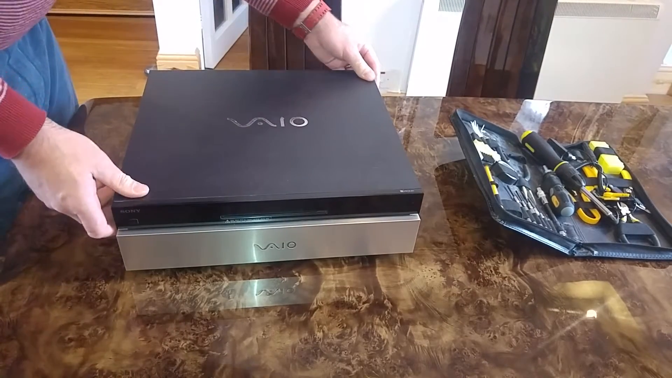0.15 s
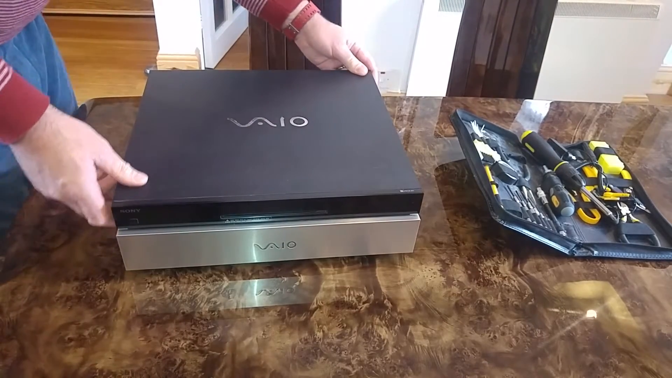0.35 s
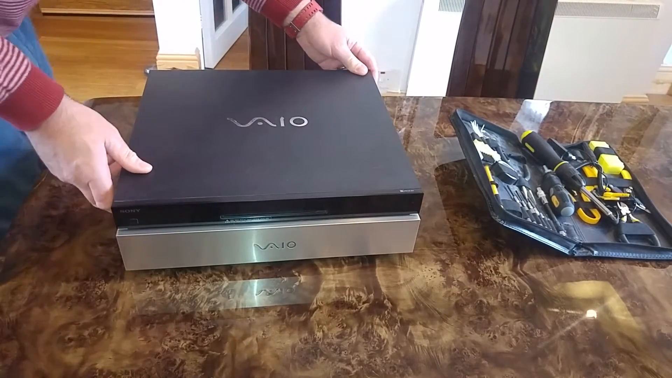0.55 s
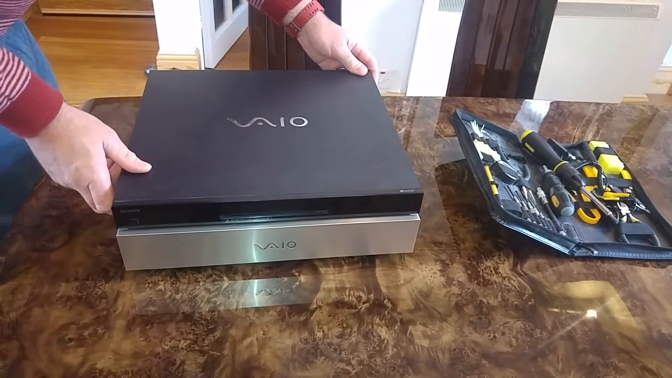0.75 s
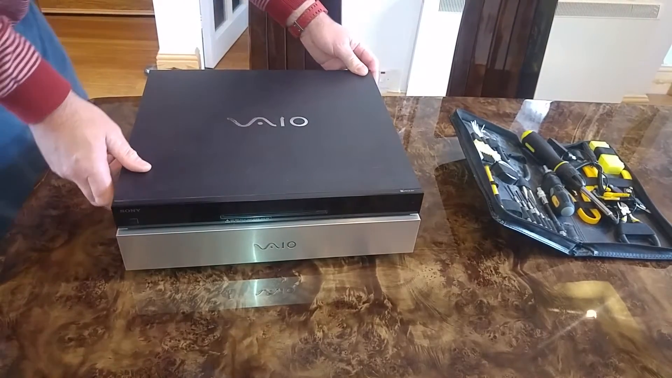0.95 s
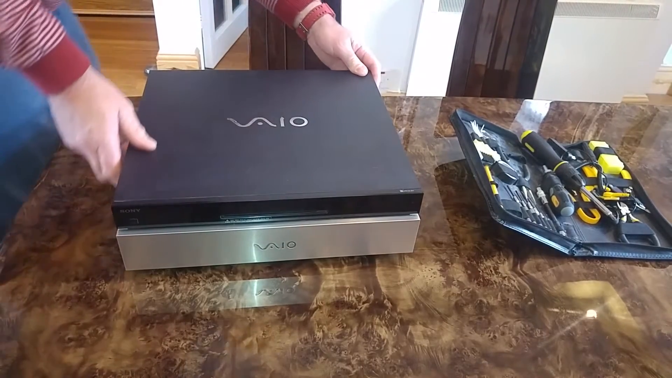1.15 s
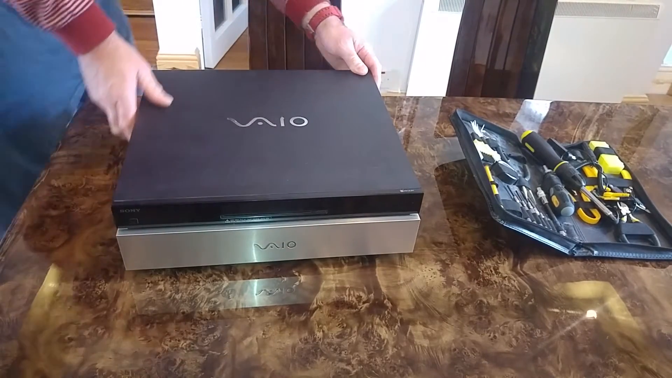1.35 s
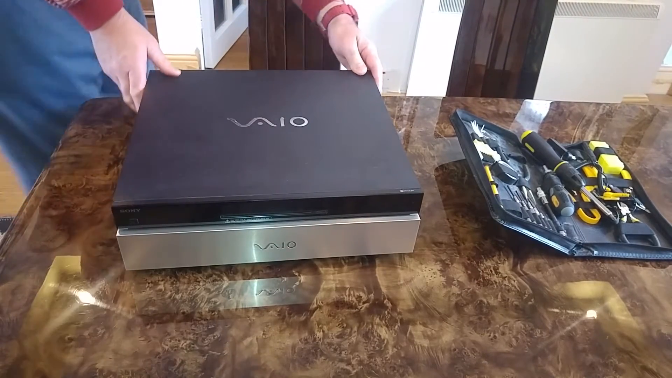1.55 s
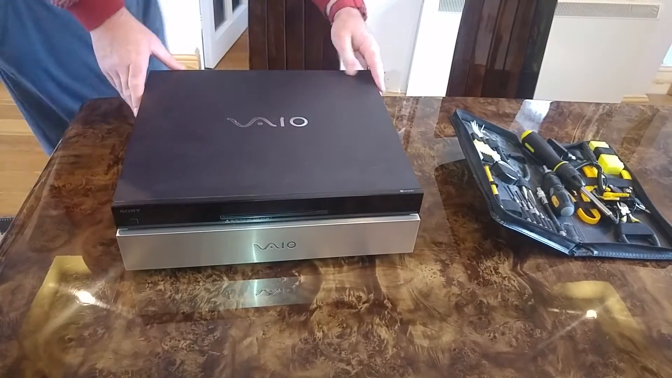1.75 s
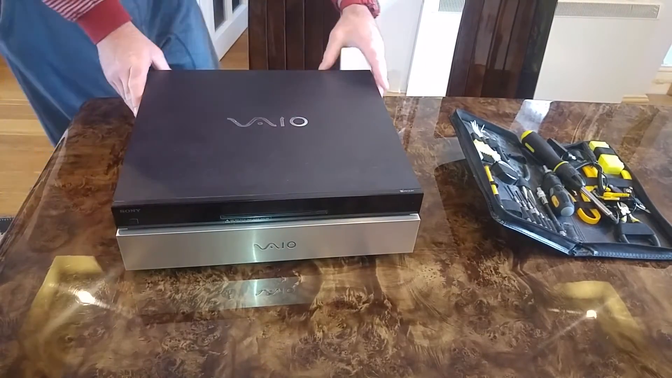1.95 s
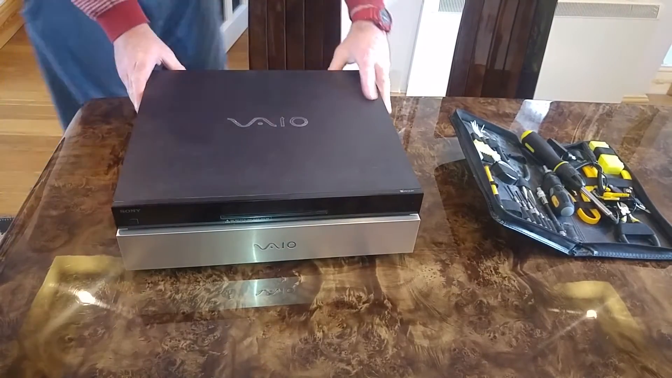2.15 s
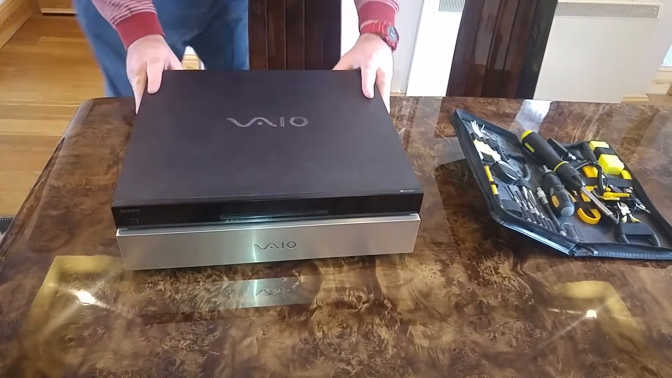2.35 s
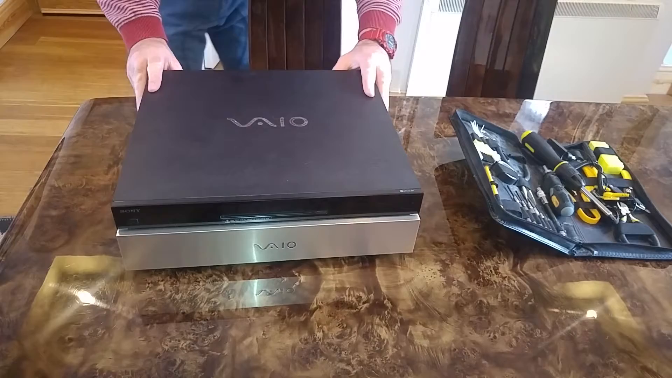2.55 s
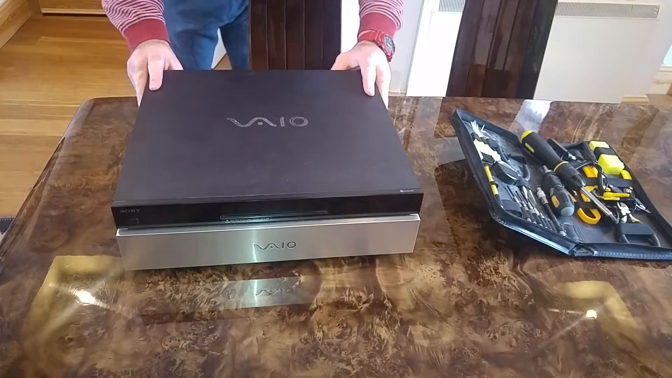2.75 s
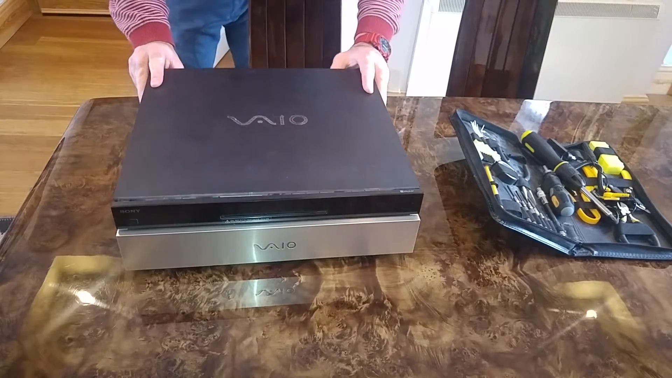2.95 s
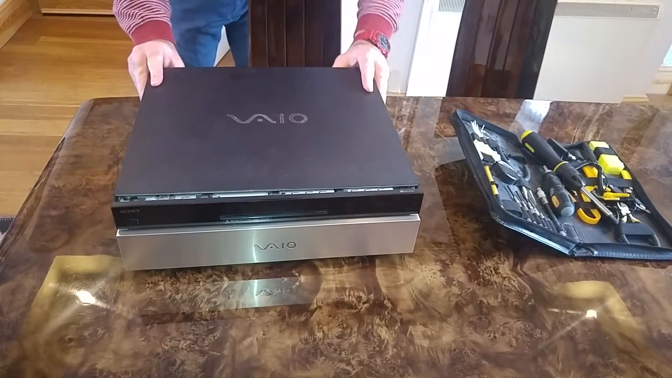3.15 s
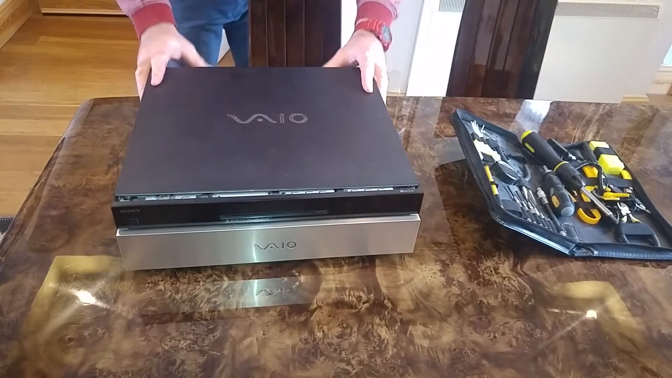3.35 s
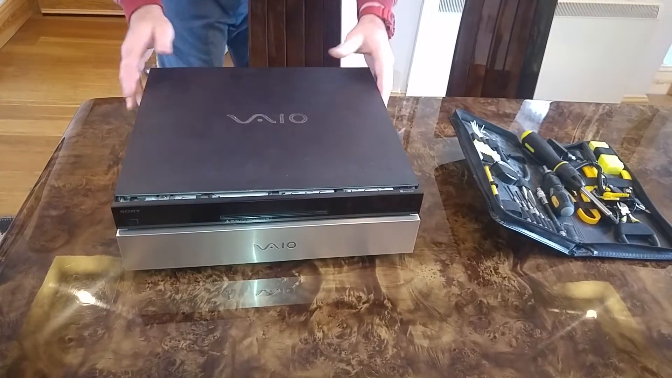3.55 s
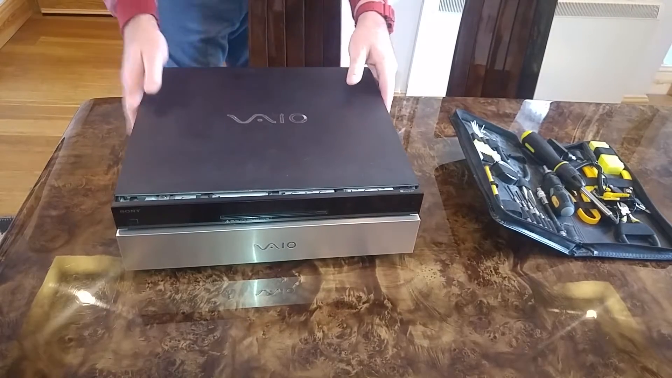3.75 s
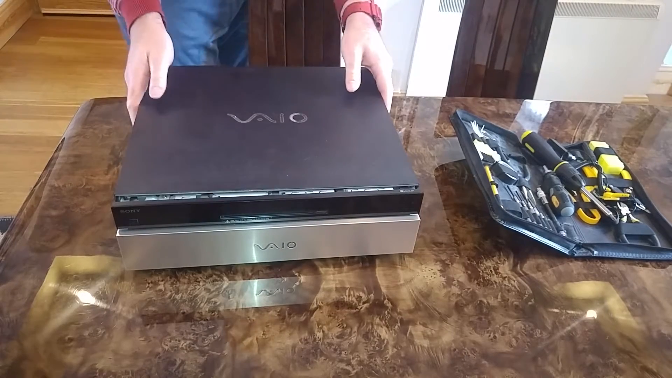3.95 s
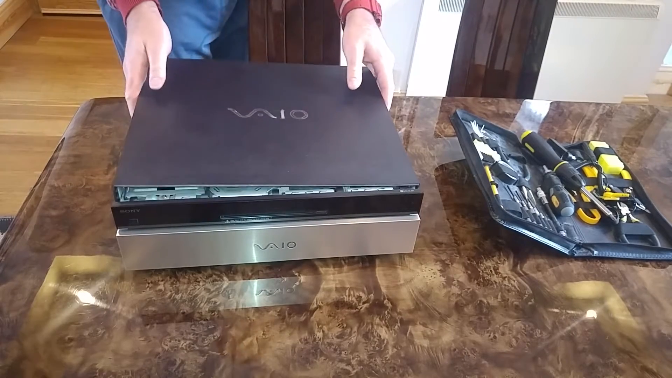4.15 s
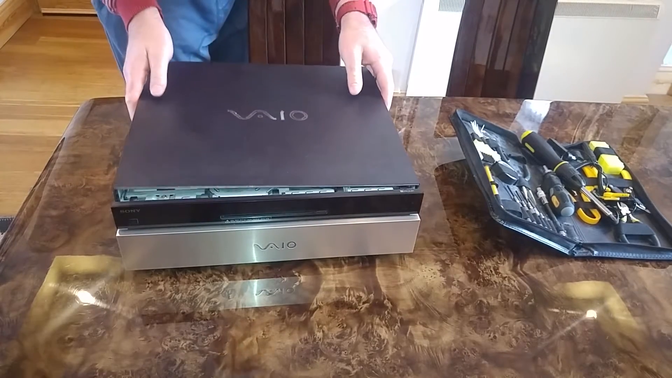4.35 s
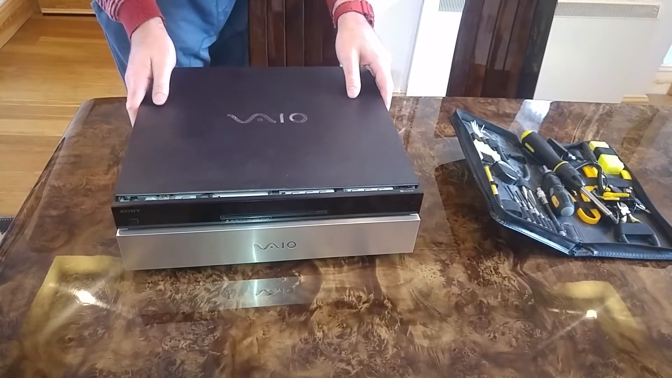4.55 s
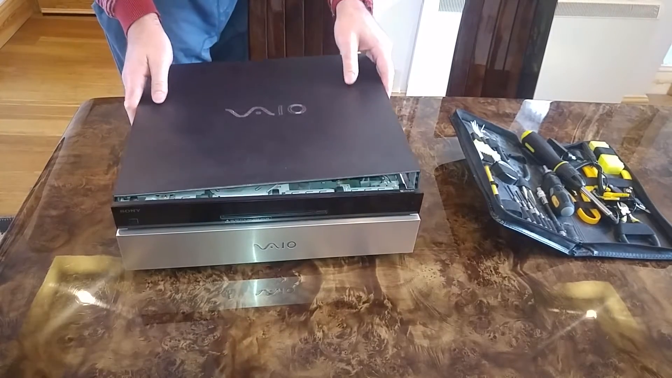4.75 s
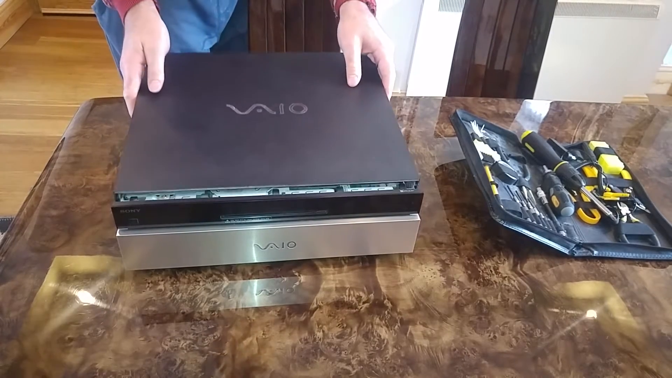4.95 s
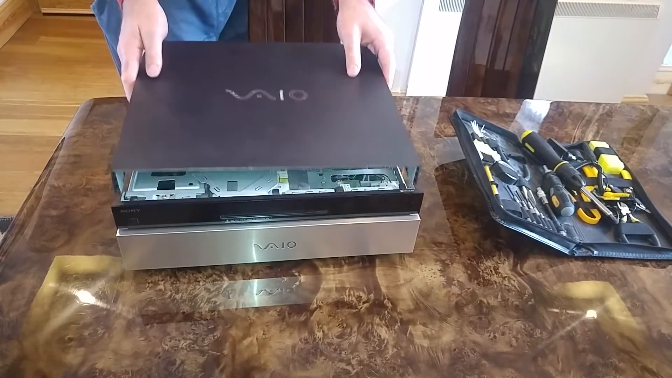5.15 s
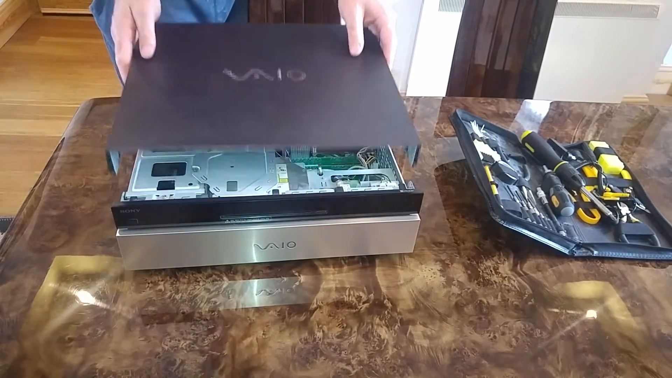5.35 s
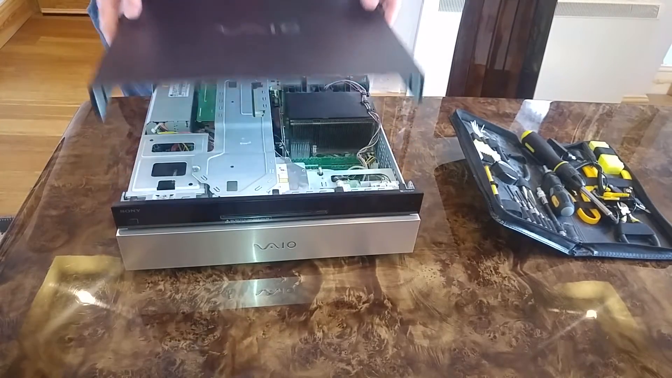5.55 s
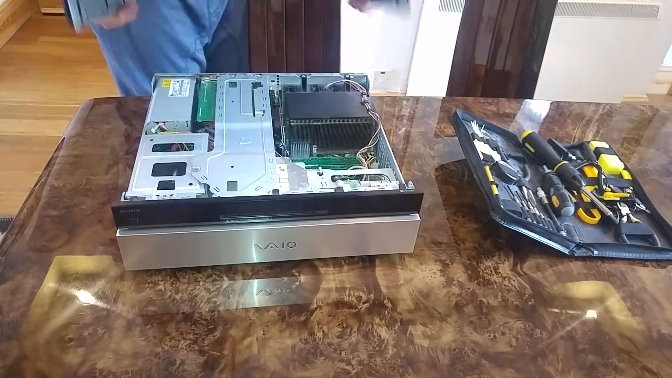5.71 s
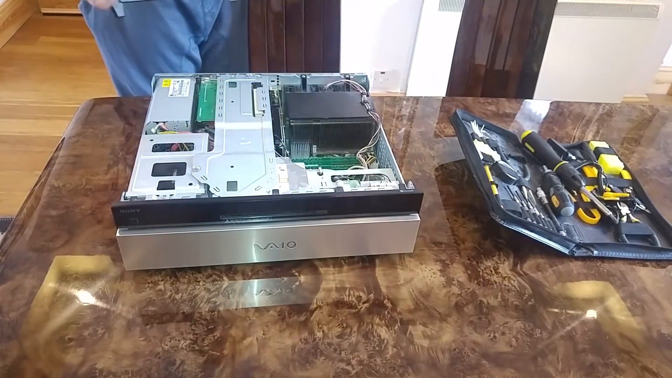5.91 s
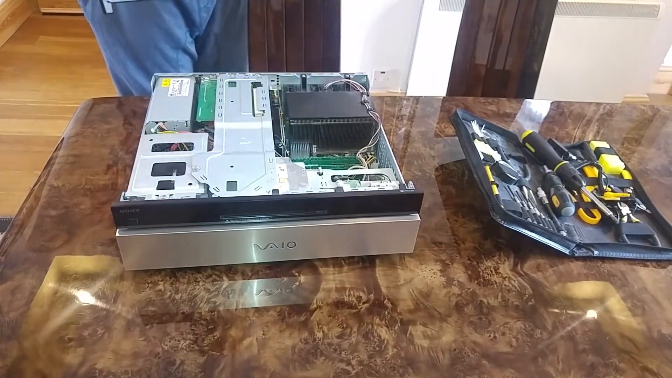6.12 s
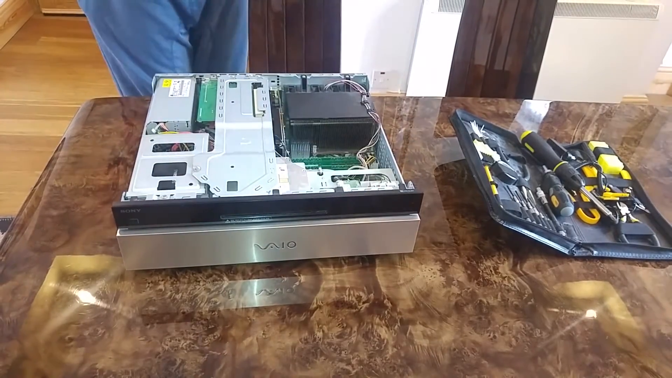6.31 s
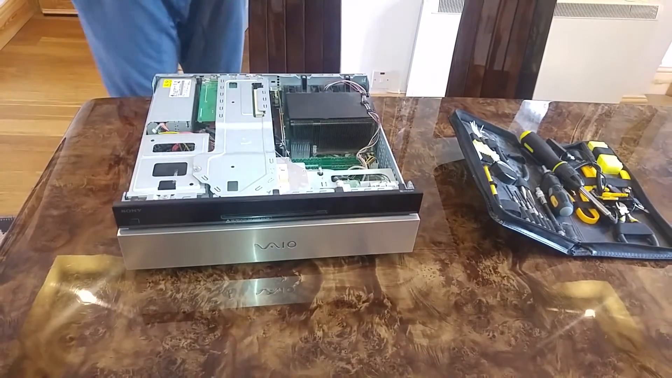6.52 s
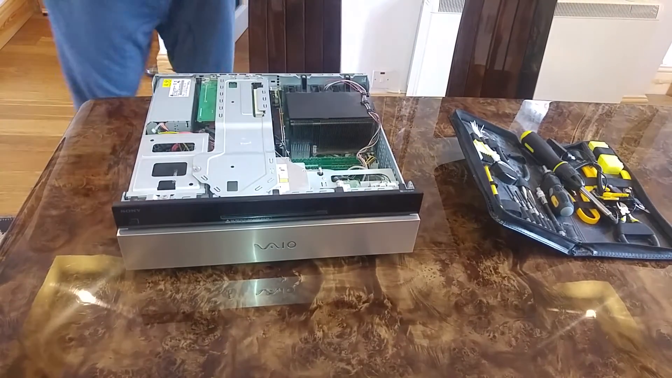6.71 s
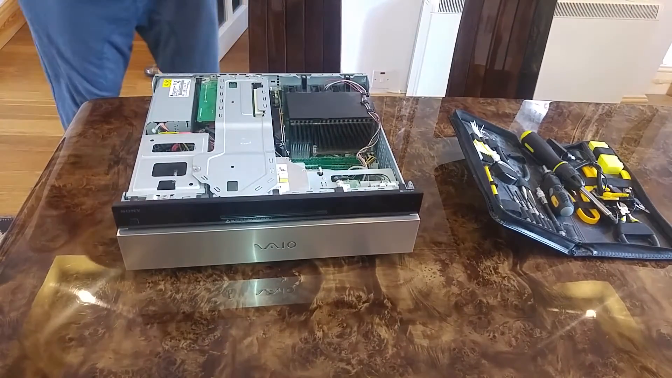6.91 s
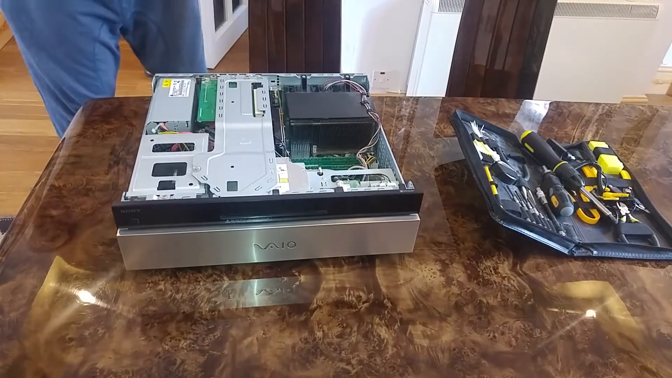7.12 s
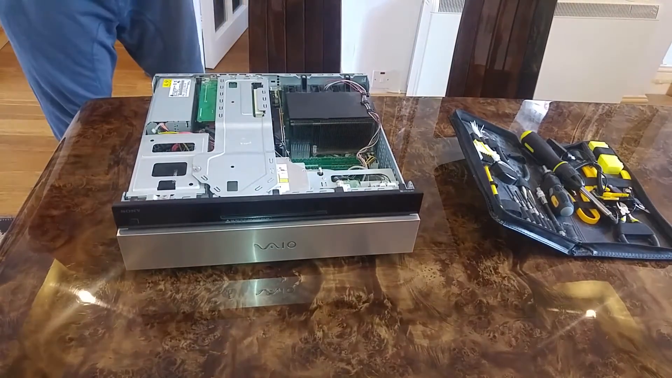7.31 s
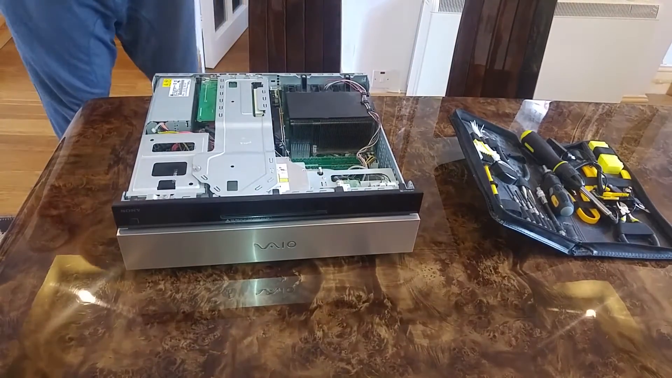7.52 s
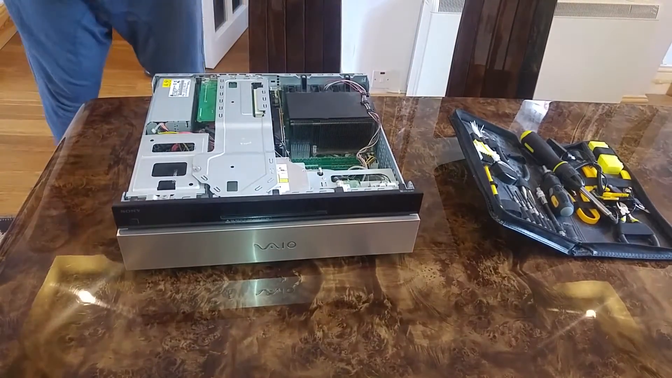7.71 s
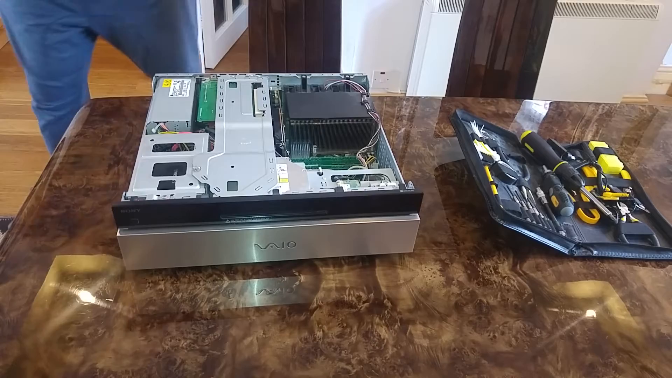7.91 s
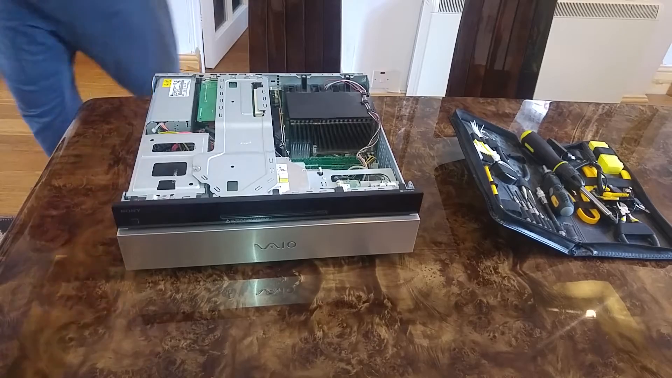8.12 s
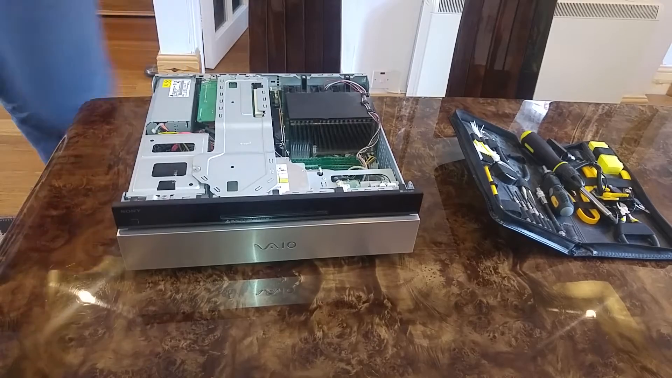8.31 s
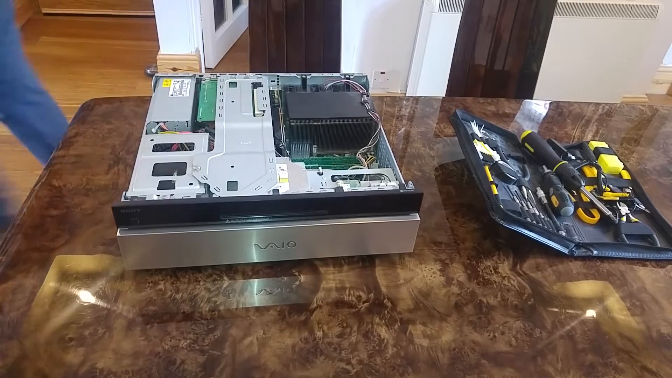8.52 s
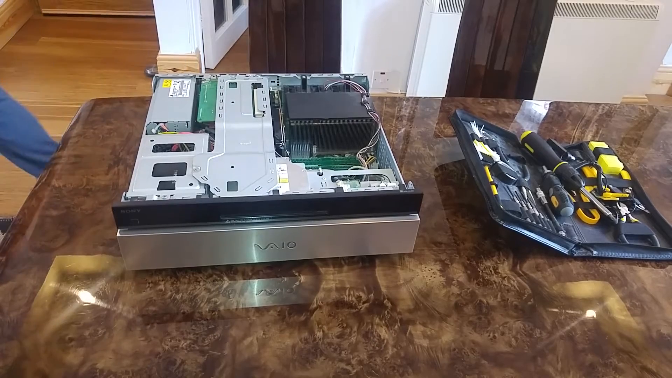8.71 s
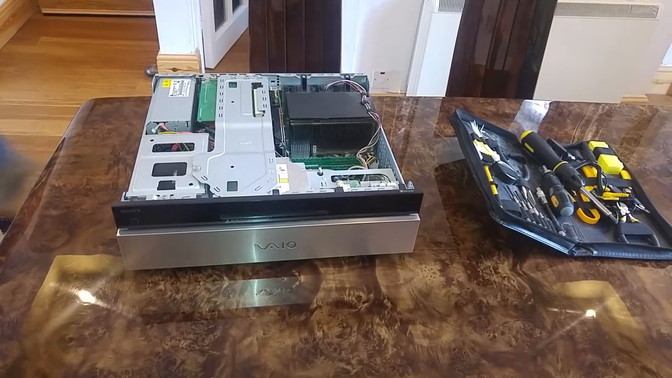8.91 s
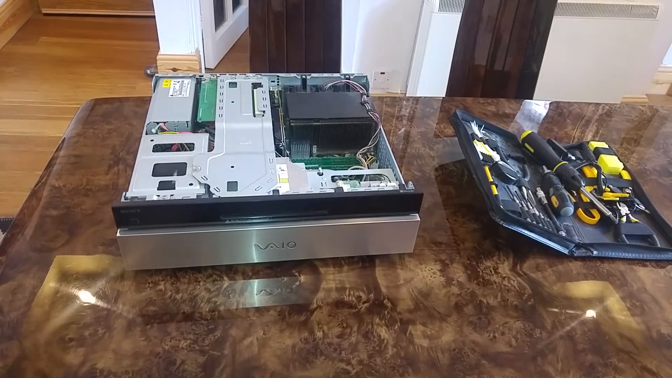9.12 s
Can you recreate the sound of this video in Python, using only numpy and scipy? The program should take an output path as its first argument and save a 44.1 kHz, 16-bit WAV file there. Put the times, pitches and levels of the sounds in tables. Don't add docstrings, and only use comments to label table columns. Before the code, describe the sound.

In a small, hard-walled room with a faint steady hush, two close microphones hear hands on a sheet-steel case. From 0 to 2 s palms and fingers hiss softly over the lid, with light rail scrapes, small ticks and a dull floor thump near 0.8; a longer wipe comes around 1.4. At 2.25 a heavier footfall lands with a low knock. Near 3.0 the cover jolts to its stop: a sharp crack, hollow boom and brief rattle. Around 3.5 to 3.9 the flange hums and faintly squeals along its rail, ending in a knock. Light clicks follow, then from 4.55 to 5.0 a flurry of clanks, strongest at 4.7, with drumming metal and buzzing tabs. Scraping fades as the lid lifts away. From 6 s it is quiet: cloth swishes, small taps, faint scuffs, soft steps near 8, then a deeper thud and clear brushing rustle around 8.8 to 9.

```python
import sys
import numpy as np
from scipy import signal
from scipy.fft import rfft, irfft, next_fast_len
from scipy.io import wavfile
from scipy.ndimage import uniform_filter1d, map_coordinates

SR = 44100
rng = np.random.default_rng(int(sys.argv[2]) if len(sys.argv) > 2 else 0)


def wrap_up_sound(samples):
    columns = np.atleast_2d(samples).T
    tamed = np.clip(columns, -1, 1)
    steps = np.round(tamed * 32767).astype(np.int16)
    wavfile.write(sys.argv[1], SR, steps)


def attenuation_scalar(level_db):
    decades = np.asarray(level_db, float) / 20
    return 10 ** decades


N = 408807

# pitch_hz, level_db
HUSH_COLOUR = [(15, -35.5), (25, -2.5), (158, -9), (450, -17.5), (621, -9), (3000, -22.5), (7280, -17),
               (15000, -39)]
# pitch_hz, likeness_0_to_1
LIKENESS = [(60, .97), (220, .95), (500, .62), (1200, .2), (3000, .05), (7000, .3), (15000, .45)]
# pitch_hz, left_minus_right_db
MICROPHONE_LEAN = [(60, -1.5), (150, -2.5), (380, -0.5), (950, -1), (2380, -0.5), (5980, -2.5), (15000, 3)]
# pitch_hz, width_hz, depth_0_to_1
TABLE_BOUNCE = (500, 55, .85)
# pitch_hz, ring_s
WALL_ECHO = [(100, 0.4), (500, 0.29), (3000, .36), (10000, 0.25), (16000, 0.14)]

# pitch_hz, level_db
FLOOR_COLOUR = [(21, -37.5), (35, -7.5), (54, -7.5), (69, -6), (162, -16.5), (250, -34.5), (320, -61.5),
                (550, -120)]
# start_s, rise_s per 20 dB, fall_s per 20 dB, level_db
WEIGHT_SHIFTS = [(.49, 1.5, 0.5, -71), (.75, 0.3, 0.46, -56), (1.55, 0.8, 1.5, -62.5),
                 (2.45, -0.9, 0.8, -58.5), (3.12, -0.06, 0.25, -51), (3.7, 1, 0.5, -62.5),
                 (4.91, 0.45, 0.21, -52), (5.95, 0.7, 0.9, -74.5), (6.5, -0.4, 0.1, -66),
                 (6.9, 0.34, 0.25, -66.5), (7.49, 0, 0.34, -59), (8.16, 0.1, .23, -59),
                 (8.98, 0.45, 0.7, -55.5)]
# start_s, level_db, board_pitch_hz, ring_s
FOOTFALLS = [(0.496, -64, 61.9, 0.3), (0.669, -64, 61, 0.27), (0.752, -44, 115, 0.32),
             (0.84, -37, 90.5, 0.082), (2.252, -30, 87.6, 0.38), (2.291, -32, 73.5, 0.46),
             (3.402, -48.5, 130, 0.17), (7.324, -61, 86.3, 0.19), (7.494, -60, 73, 0.3),
             (8.002, -41, 60.4, 0.49), (8.121, -40, 58.6, 0.12), (8.574, -51, 49, 0.27),
             (8.801, -29.5, 53.7, 0.59), (8.899, -30.5, 74.6, 0.29)]

# pitch_hz, level_db
SKIN_COLOUR = [(3180, -36.5), (5600, -8), (7130, 4), (8450, 2), (9890, -4.5), (12000, -9.5), (15600, -32),
               (22000, -120)]
# pitch_hz, level_db
PAINT_COLOUR = [(7000, -31.5), (10500, -2.5), (12500, 0.5), (15000, 4)]
# pitch_hz, level_db
COARSE_COLOUR = [(590, -33.5), (1000, -5), (1590, -8.5), (1910, -6.5), (2800, -7.5), (5600, -5.5),
                 (7280, -34), (12300, -120)]
# start_s, rise_s per 20 dB, hold_s, fall_s per 20 dB, level_db
PALM_WIPES = [
    (.44, .15, .15, .09, -53),
    (1.17, .11, .1, .3, -49),
    (1.4, .3, .22, .13, -45),
    (6.66, .012, .015, .045, -55),
]
# start_s, rise_s per 20 dB, hold_s, fall_s per 20 dB, level_db
FINGER_SHIFTS = [(.11, .01, .01, .05, -56), (.36, .4, .01, .1, -60), (.66, .1, .05, .1, -64),
                 (.76, .07, .05, .09, -50), (1.69, .1, .22, .1, -54), (1.94, .05, .01, .33, -52),
                 (2.26, .08, .01, .2, -52), (2.6, .8, .01, .35, -52), (2.86, .04, .01, .16, -55),
                 (2.94, .035, .01, .09, -51), (3.544, .28, .15, .1, -58), (3.728, .06, .01, .18, -48),
                 (3.938, .1, .01, .37, -63), (4.168, .3, .01, .14, -62), (4.458, .13, .01, .11, -65),
                 (4.54, .01, .45, .2, -66), (5.18, .4, .01, .055, -65)]
# start_s, rise_s per 20 dB, hold_s, fall_s per 20 dB, level_db
CLOTH_SWISHES = [(5.78, .45, .1, .1, -71), (5.92, .065, .01, .1, -58), (6.29, .5, .06, .2, -63),
                 (6.4, .07, .04, .15, -52), (6.52, .04, .015, .06, -53), (6.75, .03, .02, .2, -55),
                 (6.865, .1, .01, .06, -57), (7.52, .28, .01, .06, -55), (7.56, .05, .25, .03, -66),
                 (8.0, .02, .05, .17, -55), (8.2, .025, .01, .3, -50), (8.8, .012, .03, .1, -52),
                 (8.88, .055, .02, .12, -35), (9.21, .085, .1, .1, -53)]
# start_s, rise_s per 20 dB, hold_s, fall_s per 20 dB, level_db
SOLE_SCUFFS = [
    (5.05, 0.8, 0.0095, 0.31, -67.5),
    (5.91, 0.65, 0.0079, 0, -73),
    (6.97, -0.44, 0.0355, 0.04, -61.5),
    (7.42, -0.02, 0.016, 0.27, -63),
    (8.28, -0.13, 0.0065, 0.07, -54),
    (8.6, 0.05, 0.0027, 0.2, -55.5),
    (8.74, -3, 0.036, 8, -76),
    (9.24, 0.12, .03, .1, -55.5),
]
# fine_hiss_db, coarse_hiss_db, upper_panel_db, lower_panel_db
PALM_LAYERS = (2.5, -13.5, -22, -24)
FINGER_LAYERS = (-7.5, -7.5, -13.5, -16)
CLOTH_LAYERS = (-9, -9.5, -21, -25.5)
SOLE_LAYERS = (-8.5, -2, -11, -17)

# start_s, level_db, pitch_hz, width_hz, fall_s per 20 dB
LOOSE_PARTS = [(0, -63, 2430, 4100, 0.2), (.101, -50, 7600, 3500, .03), (1.94, -39, 1350, 905, -0.08),
               (2.244, -48, 1424, 111, 0.04), (2.258, -48, 1426, 120, -0.03), (2.25, -42, 520, 400, 0.02),
               (2.861, -49, 6900, 4007, -0.06), (2.932, -49, 7000, 1191, .035),
               (2.932, -44, 1900, 900, .03), (2.995, -47, 12500, 4000, .07),
               (2.9953, -23, 10500, 7000, .009), (2.984, -35, 1900, 1200, .1), (3.03, -25, 690, 160, 0.06),
               (3.548, -47, 7500, 4027, -0.37), (3.805, -56.5, 3700, 1198, -0.03),
               (3.812, -58.5, 2150, 250, -0.03), (3.916, -50, 3320, 298, 0.05),
               (3.916, -41, 1600, 900, .05), (3.916, -39, 925, 120, 0.01), (4.377, -57, 1350, 1200, 0.26),
               (4.54, -54.5, 8500, 4000, -0.1), (4.557, -47, 1200, 500, .08), (4.708, -29, 1300, 1200, .05),
               (4.71, -45, 3500, 2000, -0.5), (4.79, -35, 1100, 1200, .045),
               (4.795, -48.5, 3500, 2484, 0.14), (4.9, -50.5, 3100, 1997, 0.13),
               (5.014, -58, 2900, 500, 0.07), (6.649, -51, 7550, 4000, 0), (8.0, -59, 1300, 595, -0.02),
               (8.0, -52.5, 170, 90, 0), (9.17, -58, 260, 80, .3), (.05, -64, 290, 60, .2),
               (.93, -68, 1500, 3000, .15), (.66, -62, 750, 350, .4), (7.3, -66, 2500, 4000, .12),
               (7.999, -56, 7000, 5000, 0.1), (8.199, -49, 7500, 3996, -0.5),
               (8.799, -54, 7500, 4000, -0.1)]

# pitch_hz, level_db, ring_s
RUBBED_UPPER = [(585, -8, .06), (655, -5, .06), (735, 0, .08), (870, -10, .05), (990, -9, .07),
                (1170, -12, .08), (1500, -17, .03)]
# pitch_hz, level_db, ring_s
RUBBED_LOWER = [(187, -5, .06), (299.2, -2.5, 0.091), (333, -1, 0.057), (393, 1, 0.035)]
# pitch_hz, level_db, ring_s
SQUEAL_MODES = [(749, -3, 0.048), (1170, -16, 0.098), (1940, -20.5, 0.056)]
# start_s, rise_s per 20 dB, hold_s, fall_s per 20 dB, level_db
FLANGE_HUM = (3.52, .2, .12, .08, -51)
# start_s, rise_s per 20 dB, hold_s, fall_s per 20 dB, level_db
FLANGE_SQUEAL = (3.42, .08, .36, .05, -54)
# start_s, rise_s per 20 dB, fall_s per 20 dB, upper_db, lower_minus_upper_db
RAIL_SCRAPES = [(.07, .25, .08, -65, 1.5), (.3, .1, .08, -59, 1.5), (.59, .24, .12, -59, -12),
                (.79, .08, .12, -56, 6), (1.42, .24, .9, -62, -7), (1.96, .08, .14, -48, -11),
                (2.255, .015, .25, -57, 8), (2.78, .9, .3, -64, -4), (2.92, .3, .7, -59, 0),
                (3.55, .35, .5, -59, -5), (3.82, .05, .1, -49, 5), (3.918, .01, .09, -44, -25),
                (4.0, .1, .45, -62, -1.5), (4.45, .12, .4, -59, 2.5), (5.05, .6, .09, -57, 1.5),
                (5.205, .05, .1, -72, 13), (5.55, .5, .5, -82, 9)]
# start_s, rise_s per 20 dB, fall_s per 20 dB, upper_db, lower_minus_upper_db
CARRIED_FLEXES = [
    (5.79, .02, .35, -69, 4),
    (6.53, .6, .06, -70, 4),
    (6.99, .5, .08, -67, -8),
    (7.48, .2, .2, -68, 7),
    (8.005, .015, .12, -59, 5),
    (8.36, .3, .11, -61, -8),
    (8.53, .03, .5, -68, -6),
    (8.89, .12, .2, -50, -4),
    (8.96, .1, .09, -53, 6),
    (9.27, .05, .1, -50, -11),
]

# start_s, level_db
LID_BOOMS = [
    (2.999, -36),
    (3.81, -54.5),
    (4.564, -59),
    (4.721, -39.5),
    (4.852, -39.5),
]
# pitch_hz, level_db, ring_s
LOWER_MODES = [(300, -1, .3), (350, -3, .25), (378, -2, .25), (409, 0, .22), (440, -12, .15)]
# pitch_hz, level_db, ring_s
UPPER_MODES = [(560, -4, 0.046), (680, 2.5, 0.2), (644, -5.5, 0.47), (710, -9.5, 0.19), (820, 0, 0.064),
               (871, -3, 0.42), (952, -2, 0.23), (1005, 0, 0.08), (1126, -13.5, 0.16)]
# pitch_hz, level_db, ring_s
CLANK_TREND = [(1248, -4, 0.25), (1480, -1, 0.2), (1900, -6, 0.12), (2320, -10, 0.08), (2900, -19, 0.06),
               (3554, -17.5, 0.04), (4230, -20, 0.057)]
# pitch_hz, level_db
CRACK_COLOUR = [(2000, -35.5), (3900, -15.5), (4750, -12.5), (7300, -1.5), (9300, -5), (11500, -16),
                (13000, -15.5), (15000, -16)]
# start_s, upper_db, lower_db, clank_db, crack_db
HELD_KNOCKS = [(.281, -56.5, 1, -5, -1), (1.166, -48.5, 4.5, -5, 0.5), (2.25, -52, 9, -11, -12),
               (2.932, -51.5, -4, 6.5, -12), (2.9953, -26.5, 3, -6, 14.5), (3.245, -47.5, 8.5, -9, -11),
               (3.916, -37, -15, -24, -26), (4.707, -21, 1.5, -2.5, -1), (4.744, -32, -2.5, -5, -20),
               (4.902, -36.5, 15.5, -5.5, 0), (5.017, -54, -7.5, 8, -3.5), (5.191, -61, 2, -17.5, -17),
               (6.505, -56.5, 0, -25, 2)]
# start_s, upper_db, lower_db, clank_db, crack_db
FREE_KNOCKS = [(.559, -50.5, -35, -45, -5), (1.022, -64.5, 11.5, -2, -23), (2.858, -47, -14, -4.5, 0),
               (2.984, -23, 8.5, 0.5, -5), (3.013, -30, 3, -14.5, -7.5), (4.155, -53.5, 3, -9, -5),
               (4.622, -47.5, 9.5, -18.5, -15), (4.957, -52, -10, -21, -11.5), (5.143, -54, -8.5, -1, -3),
               (5.785, -62, 8.5, -2, 3.5), (8.198, -62, -7.5, -15, 8.5)]
# start_s, upper_db, lower_db, clank_db, crack_db
SHOVES = [(3.029, -22, 5, -20, -19), (3.808, -46, -7, -7, -8), (4.375, -56, -0.5, -3, -15),
          (4.484, -58.5, 8, -12.5, -20.5), (4.557, -38, 11.5, -8, -11), (4.579, -41, -0.5, -2.5, -6.5),
          (4.727, -35, 0, -2.5, -3.5), (4.789, -29, 5, -3, 2), (4.801, -36, 14.5, -7, -0.5),
          (4.897, -42.5, 7, -2, 4), (4.93, -44, 1, -6, -2), (4.676, -47.5, 15, -5.5, 1.5)]
HELD_RING, FREE_RING, SHOVED_RING = 0.33, 0.62, 0.38
BLOW_S, SHOVE_S = 0.0049, 0.0085


def unit(x):
    return x / np.sqrt(np.mean(x ** 2) + 1e-20)


def along(points, hz):
    f, v = np.transpose(points)
    return np.interp(np.log(hz + 1), np.log(f + 1), v)


def spectrum(points):
    return lambda hz: attenuation_scalar(along(points, hz))


def wobble(rate):
    knots = rng.standard_normal(int(N * rate / SR) + 4)
    return map_coordinates(knots, [np.arange(N) * rate / SR])


def filtered(x, response):
    m = next_fast_len(x.shape[-1] + SR // 2)
    shaped = rfft(x, m) * response(np.fft.rfftfreq(m, 1 / SR))
    return irfft(shaped, m)[..., :x.shape[-1]]


def grit(colour, grain_db, rate):
    sizes = attenuation_scalar(grain_db * np.array([wobble(rate), wobble(rate)]))
    return unit(filtered(sizes * rng.standard_normal((2, N)), colour))


def strokes(start, rise, hold, fall, db):
    t = np.arange(0, N / SR + 0.002, 0.001)[:, None]
    early = (start - t) / np.maximum(rise, 0.004)
    late = (t - start - np.abs(hold)) / np.maximum(fall, 0.004)
    below_db = 20 * np.maximum(0, np.maximum(early, late))
    power = attenuation_scalar(2 * (db - below_db)).sum(1)
    return np.interp(np.arange(N) / SR, t[:, 0], power)


def spread(pair):
    def mid_and_side(hz):
        turn = np.arccos(np.clip(along(LIKENESS, hz), -1, 1)) / 2
        return np.array([np.cos(turn), np.sin(turn)])

    mid, side = filtered(pair, mid_and_side)
    return np.array([mid + side, mid - side])


def hush():
    return attenuation_scalar(-78.5) * grit(spectrum(HUSH_COLOUR), 0.3, 5)


def room(x):
    out = np.zeros((2, N + 2 * SR))
    hop, delay = SR // 8, 130
    for at in range(0, N, hop):
        hz, t, z = signal.stft(rng.standard_normal((2, SR // 3)), SR, nperseg=256)
        fade = attenuation_scalar(-60 * t / along(WALL_ECHO, hz)[:, None])
        tail = signal.istft(z * fade, SR, nperseg=256)[1]
        echo = signal.fftconvolve(x[None, at:at + hop], tail / np.linalg.norm(tail[0]), axes=1)
        out[:, at + delay:at + delay + echo.shape[1]] += echo
    return out[:, :N]


def boards():
    start, rise, fall, db = np.transpose(WEIGHT_SHIFTS)
    return np.sqrt(strokes(start, rise, 0, fall, db)) * grit(spectrum(FLOOR_COLOUR), 3, 10)


def steps():
    out, t = np.zeros(N + SR), np.arange(SR) / SR
    landing = 1 - np.exp(-t / 0.0057)
    for start, db, hz, ring_s in FOOTFALLS:
        swing = 2.8 * np.sin(2 * np.pi * hz * t) + 0.95 * np.sin(2 * np.pi * 1.4 * hz * t)
        fade = attenuation_scalar(db - 4.5 - 60 * t / np.clip(ring_s, 0.05, 2))
        out[round(start * SR):][:len(t)] += fade * landing * swing
    return out[:N]


def contacts():
    kinds = [(PALM_WIPES, PALM_LAYERS), (FINGER_SHIFTS, FINGER_LAYERS),
             (CLOTH_SWISHES, CLOTH_LAYERS), (SOLE_SCUFFS, SOLE_LAYERS)]
    power = 0
    for rows, layers in kinds:
        shares = attenuation_scalar(2 * np.append(0, layers))[:, None]
        power = power + strokes(*np.transpose(rows)) * shares
    return np.sqrt(np.abs(uniform_filter1d(power, size=150))) * attenuation_scalar(0.77 * wobble(28))


def rubbing(hiss, fine, coarse):
    skin = hiss * grit(spectrum(SKIN_COLOUR), 1.3, 900)
    paint = fine * grit(spectrum(PAINT_COLOUR), 1.8, 1300)
    scuff = coarse * grit(spectrum(COARSE_COLOUR), 1.1, 300)
    return skin + paint + scuff


def buzzes():
    out, t = np.zeros(N + SR), np.arange(SR // 3) / SR
    shape = (len(LOOSE_PARTS), len(t))
    slips = rng.standard_normal(shape) * attenuation_scalar(3 * rng.standard_normal(shape))
    for (start, db, hz, width_hz, fall), shaken in zip(LOOSE_PARTS, slips):
        band = lambda f: (1j * f * width_hz / (hz * hz - f * f + 1j * f * width_hz)) ** 2
        swell = (1 - np.exp(-t / 0.0007)) * attenuation_scalar(db - 20 * t / max(fall, 0.005))
        out[max(round(start * SR), 0):][:len(t)] += swell * unit(filtered(shaken, band))
    return out[:N]


def body(modes):
    def response(f):
        total = 0
        for k, (hz, db, ring_s) in enumerate(modes):
            damping = 1j * f * np.log(1000) / (np.pi * ring_s)
            total = total + (-1) ** k * attenuation_scalar(db) * damping / (hz * hz - f * f + damping)
        return total

    return response


def dragging(rubbed_upper, rubbed_lower):
    start, rise, fall, db, lower_db = np.transpose(RAIL_SCRAPES + CARRIED_FLEXES)
    upper_drive = np.sqrt(strokes(start, rise, 0, fall, db) + rubbed_upper ** 2)
    lower_drive = np.sqrt(strokes(start, rise, 0, fall, db + lower_db) + rubbed_lower ** 2)
    flange_hz = 187 + 4 * wobble(22)
    hum = np.sin(2 * np.pi * np.cumsum(flange_hz) / SR) * attenuation_scalar(2.5 * wobble(25)) * [[1], [0.3]]
    hum = np.sqrt(strokes(*FLANGE_HUM)) * hum
    squeal = np.sqrt(strokes(*FLANGE_SQUEAL)) * grit(body(SQUEAL_MODES), 3.7, 45)
    upper = upper_drive * grit(body(RUBBED_UPPER), 3, 40)
    lower = lower_drive * grit(body(RUBBED_LOWER), 3, 30)
    return upper + lower + hum + squeal


def booms():
    out, t = np.zeros(N + SR), np.arange(SR) / SR
    lid_hz, ring_s = 118, 0.55
    swing = (1 - np.exp(-t / 0.0081)) * np.sin(2 * np.pi * lid_hz * t)
    for start, db in LID_BOOMS:
        out[round(start * SR):][:len(t)] += attenuation_scalar(db + 6 - 60 * t / ring_s) * swing
    return out[:N]


def crowd(trend, count):
    f, db, ring_s = np.transpose(trend)
    hz = f[0] + (f[-1] - f[0]) * (np.arange(count) + rng.random(count)) / count
    return np.transpose([hz, np.interp(hz, f, db), np.interp(hz, f, ring_s)])


def ring(modes, t, chance, shake):
    hz, db, ring_s = np.transpose(modes)[:, :, None]
    size, bend, loose = chance[:, :len(modes), None]
    gain = attenuation_scalar(db + 2.2 * size)
    phase = 2 * np.pi * hz * (1 + 0.012 * bend) * t
    swing = np.sin(phase + (loose + np.sign(loose)) * shake)
    return (gain * attenuation_scalar(-60 * t / ring_s) * swing).sum(0) / np.linalg.norm(gain)


def knocks():
    out, t = np.zeros(N + SR), np.arange(SR // 4) / SR
    kinds = [(HELD_KNOCKS, HELD_RING, BLOW_S), (FREE_KNOCKS, FREE_RING, BLOW_S),
             (SHOVES, SHOVED_RING, SHOVE_S)]
    hits = [(*row, share, span) for rows, share, span in kinds for row in rows]
    chance = rng.standard_normal((len(hits), 3, 3, 36))
    rattle = unit(filtered(rng.standard_normal(N + SR), spectrum(CRACK_COLOUR)))
    blows = rng.standard_normal(N + SR) * attenuation_scalar(5.8 * rng.standard_normal(N + SR))
    seams = np.pad(2.2 * wobble(110), (0, SR))
    upper_modes = np.vstack([UPPER_MODES, crowd([(556, -5.5, 0.3), (1252, -9.5, 0.18)], count=14)])
    high_modes = crowd(CLANK_TREND, count=36)
    tick = attenuation_scalar(-60 * t / 0.002) * np.sin(2 * np.pi * 7000 * t)
    for (start, db, lower_db, clank_db, crack_db, share, span), c in zip(hits, chance):
        at = round(start * SR)
        now = slice(at, at + len(t))
        damped = [1, 1, np.clip(share, 0.1, 1.5)]
        shake = seams[now] - seams[at]
        panels = ring(upper_modes * damped, t, c[0], shake)
        panels += attenuation_scalar(clank_db) * ring(high_modes * damped, t, c[2], 5 * shake)
        lower = attenuation_scalar(lower_db + 5.5) * ring(np.multiply(LOWER_MODES, damped), t, c[1], 0.17 * shake)
        chatter = blows[now] * np.exp(-t / span)
        rung = signal.fftconvolve(panels, chatter / np.linalg.norm(chatter))[:len(t)]
        rung += lower * (1 - np.exp(-t / (1.15 * span)))
        rattle_fade = 0.86 * np.exp(-t / (1.2 * span)) + 0.02 * attenuation_scalar(-60 * t / 0.15)
        crack = 5 * (BLOW_S / span) ** 2 * tick + rattle_fade * rattle[now]
        out[now] += attenuation_scalar(db) * (0.74 * rung + attenuation_scalar(crack_db - 2) * crack)
    return filtered(out[:N], lambda f: (1j * f / (200 + 1j * f)) ** 3)


def scene():
    steel = knocks() + buzzes()
    hiss, fine, coarse, upper, lower = contacts()
    diffuse = rubbing(hiss, fine, coarse) + dragging(upper, lower)
    diffuse = diffuse + boards() + hush() + attenuation_scalar(-2) * room(steel)
    delay_s = np.array([[0], [0.00004]])
    direct = filtered(steel, lambda hz: np.exp(-2j * np.pi * hz * delay_s))
    return direct + steps() + booms() + spread(diffuse)


def roll_off(x):
    return signal.sosfilt(signal.butter(12, 16970, fs=SR, output="sos"), x)


def record(dry):
    centre_hz, width_hz, depth = TABLE_BOUNCE
    low_hz, top_hz = 40, 15750

    def response(f):
        damping = 1j * f * width_hz
        notch = 1 - np.clip(depth, 0, 1) * damping / (centre_hz ** 2 - f * f + damping)
        cut = (1j * f / (low_hz + 1j * f)) ** 2 * (f < top_hz)
        return notch * cut * attenuation_scalar(along(MICROPHONE_LEAN, f) * np.array([[0.5], [-0.5]]))

    ports = filtered(dry, response)
    return roll_off(ports)


dry = scene()
out = record(dry)
wrap_up_sound(out)
```